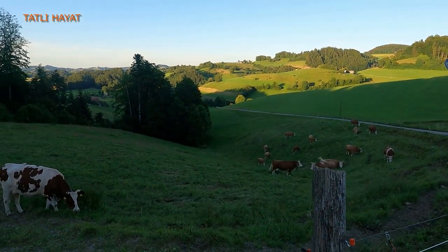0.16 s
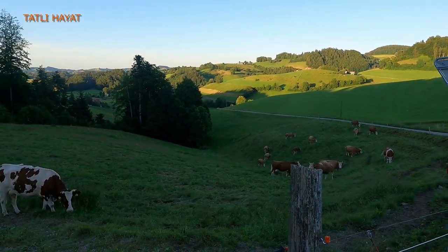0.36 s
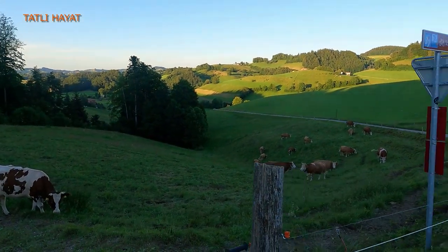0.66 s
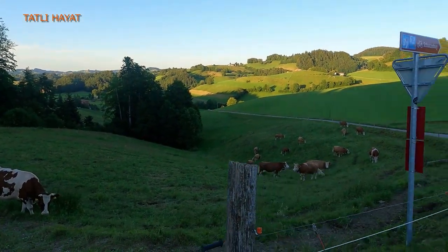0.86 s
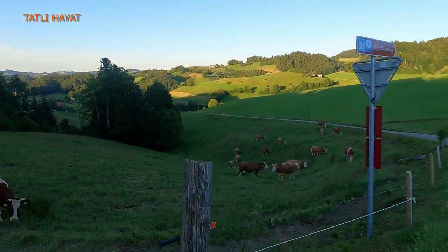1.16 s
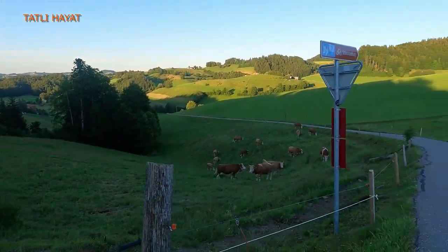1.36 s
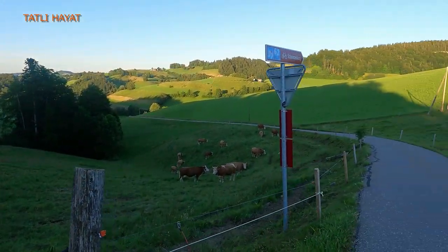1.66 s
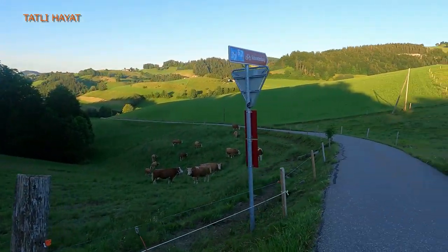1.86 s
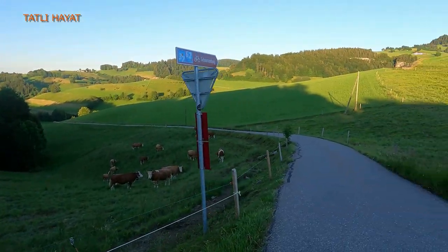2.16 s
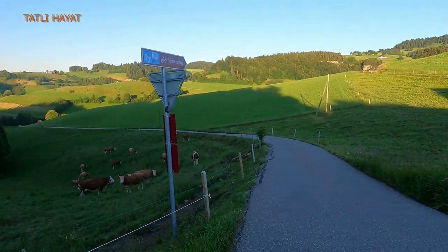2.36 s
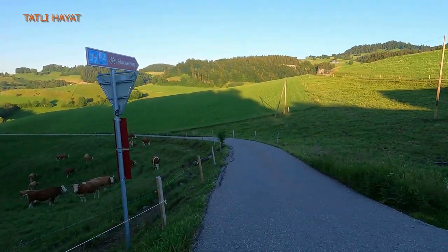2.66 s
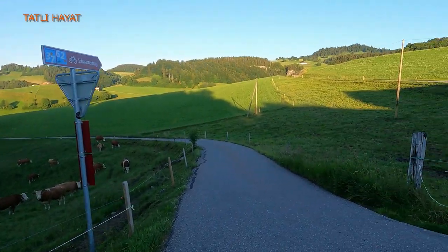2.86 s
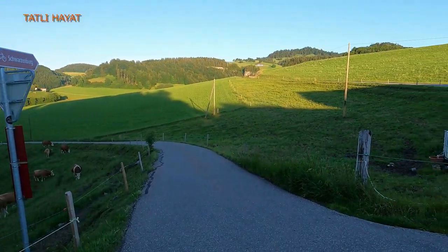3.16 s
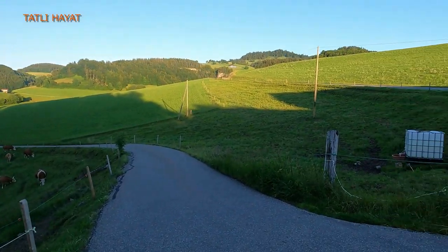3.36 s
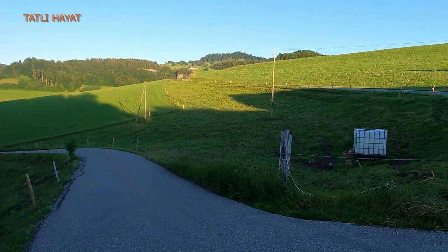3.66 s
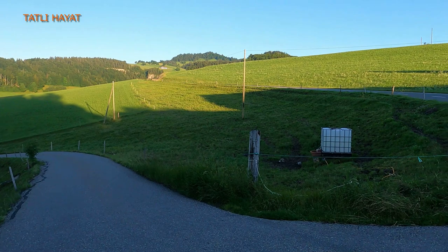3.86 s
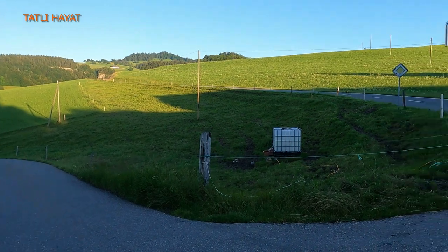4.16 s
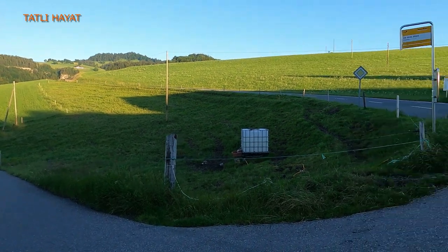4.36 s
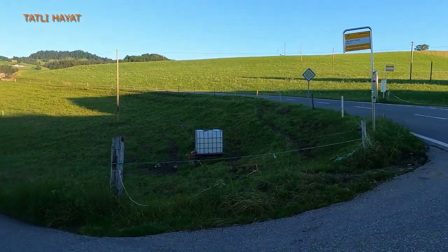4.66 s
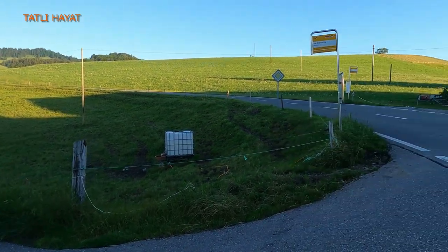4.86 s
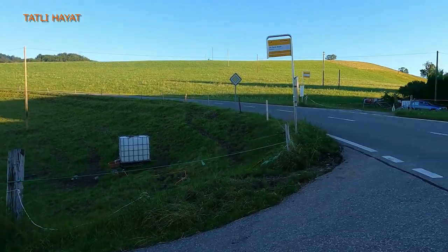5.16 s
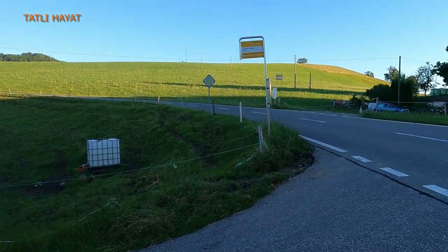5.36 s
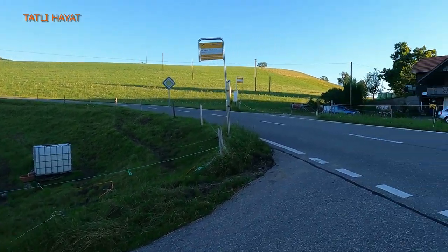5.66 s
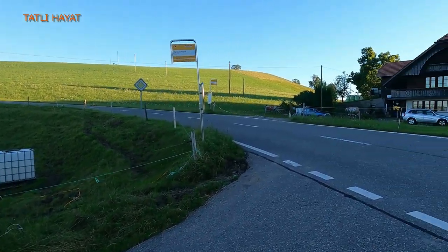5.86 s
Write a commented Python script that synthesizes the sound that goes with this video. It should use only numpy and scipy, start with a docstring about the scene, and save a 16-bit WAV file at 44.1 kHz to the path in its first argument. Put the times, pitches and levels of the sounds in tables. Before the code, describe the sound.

An open hillside pasture with a grazing herd, heard in stereo, about six seconds. From the start many bells overlap irregularly: a big sheet-metal bell with hollow clonks and rough metallic attack, a clearer cast bell that rings long, and lower, brighter and thinner bells farther off. Three tiny falling bird chips come at 0 to 0.1 and again near 2.4. Dull soft steps fall around 0.2, 0.6, 0.9, 1.1 and 2.3; a short damped metal clink sounds at 1.1. Soft low wind puffs peak near 1.7, with a grass rustle at 1.4. Strong clear ringing at 2.1, then a dense clanking run from 2.5 to 3. Between 1.2 and 4.2 the herd slides well left. Another clatter comes around 4 to 4.3, then sparser, quieter bells. A faint low motor hum swells, strongest near 5, then recedes. The slope returns a very faint dull echo.

```python
"""A hillside pasture where cows graze with bells: a big sheet-steel one, a long-ringing cast one, others further off.
Each bell is a sum of decaying modes in close pairs, plus a dense crowd of wall modes and a noisy tick at each strike.
The microphone turns away and the herd drifts left; the slope returns a faint, dull answer to the bells.
Shaped noise makes wind, grass, the valley's murmur and a few dull steps; steady tones make a distant motor.
A small bird chips in falling glides, and metal clinks as quickly damped modes."""
import sys
import numpy as np
from scipy import signal
from scipy.fft import rfft, irfft, next_fast_len
from scipy.io import wavfile
from scipy.ndimage import map_coordinates

SR = 44100
rng = np.random.default_rng(int(sys.argv[2]) if len(sys.argv) > 2 else 0)


def master_out(mix):
    """Clip the mix to full scale and print it as 16-bit PCM to the path in sys.argv[1]."""
    frames = np.transpose(np.atleast_2d(mix))
    ceiling = np.clip(frames, -1, 1)
    pcm = np.round(ceiling * 32767).astype(np.int16)
    wavfile.write(sys.argv[1], SR, pcm)


N = 265923

TOP_HZ = 15500  # upper band limit
KNEE_HZ = 2000  # hardness tilts a strike's spectrum above this
PRIME_HZ, LOW_HZ = 800, 1500  # band that holds the prime pair
UPPER_OCTAVES = 1.5  # octaves above the knee at which all upper modes are weighted

# Turn of the microphone, as the herd's left-minus-right level: (time [s], level difference [dB])
TURN = [(0, -0.5), (1.2, -1), (2.8, 6.5), (4.2, 13), (4.8, 12.5), (6.03, 12.5)]


def amp(db):
    """Level is logarithmic: 20 dB is a factor of ten in amplitude."""
    return 10 ** (np.asarray(db) / 20)


def unit(x):
    """Normalise the root mean square, the measure of mean power, to 1."""
    return x / np.sqrt(np.mean(x ** 2) + 1e-20)


def along(points, hz):
    """Interpolate (frequency, value) points on a logarithmic frequency axis, as pitch is heard."""
    f, v = np.transpose(points)
    return np.interp(np.log(hz + 1), np.log(f + 1), v)


def curve(rows):
    """Interpolate (time, value) rows linearly at every sample."""
    return np.interp(np.arange(N) / SR, *np.transpose(rows))


def wobble(rate):
    """Slow random fluctuation: a smooth spline through random knots, rate of them a second."""
    knots = rng.standard_normal(1024)
    return map_coordinates(knots, [np.arange(N) * rate / SR], mode="mirror")


def filtered(x, response):
    """Linear filtering: the spectrum is multiplied by a response of frequency."""
    m = next_fast_len(N + SR // 4)
    hz = np.fft.rfftfreq(m, 1 / SR)
    return irfft(rfft(x, m) * response(hz), m)[..., :N]


def noise(spectrum, side_db):
    """Mid-side stereo: independent noises of one colour, summed and differenced, then scaled to rms 1."""
    mid, side = filtered(rng.standard_normal((2, N)), lambda hz: amp(along(spectrum, hz)))
    side = amp(side_db) * side
    return unit(np.array([mid + side, mid - side]))


def add(track, s, sound):
    """Superposition: add a sound to a track at time s, cut at the track's ends."""
    start = round(s * SR)
    part = sound[..., max(-start, 0):max(N - start, 0)]
    first = max(start, 0)
    track[..., first:first + part.shape[-1]] += part


def upper_level(force_db, hardness=0, *place):
    """Contact duration: a harder, shorter blow drives upper modes more, wherever it lands."""
    return force_db + hardness * UPPER_OCTAVES


def mode_levels(hz, paired, force_db, hardness=0, lip_db=0, lean_db=0):
    """Modal excitation: hardness tilts the levels [dB]; the contact point weights prime pair and twins."""
    prime = (hz > PRIME_HZ) & (hz < LOW_HZ)
    twin = np.resize([-1, 1], len(hz))
    tilt_db = hardness * np.log2(np.maximum(hz / KNEE_HZ, 1))
    pair_db = force_db + tilt_db + lip_db * prime + lean_db * twin
    return np.where(paired, pair_db, upper_level(force_db, hardness))


def ring(modes, strikes, pairs_db, upper_db, uneven_db=2.5, port_db=0.0, port_phase=0.27, stop_time=0.013):
    """Modal superposition: each contact stops the old vibration and starts new decaying partials."""
    hz, mode_db, t60 = np.transpose(modes)
    # close pairs come first, since a bell is not round; then the single modes
    paired = np.arange(len(hz)) < 2 * len(pairs_db)
    balance_db = np.append(np.repeat(pairs_db, 2), np.full(np.sum(~paired), upper_db))
    mode_db = mode_db + balance_db
    gaps = np.abs(np.diff([row[0] for row in strikes] + [N / SR]))
    t = np.arange(int(gaps.max() * SR) + SR // 50) / SR
    waves = np.exp((2j * np.pi * hz - np.log(1000) / t60)[:, None] * t)
    # the low note swells in the bell's mouth, while high modes speak almost at once
    rise = .011 * (435 / hz) ** 1.2
    waves *= 1 - np.exp(-t / rise[:, None])
    # each mode's radiation pattern can set its level and phase at the two microphone ports
    level, phase = rng.standard_normal((2, len(hz)))
    port = np.array([[1], [-1]])
    port_angle = port * port_phase * phase * np.clip(hz / KNEE_HZ, 0, 2)
    ports = amp(port * port_db * level) * np.exp(1j * port_angle)
    out = np.zeros((2, N))
    for (s, *strike), gap in zip(strikes, gaps):
        db = mode_db + mode_levels(hz, paired, *strike) + uneven_db * rng.standard_normal(len(hz))
        blow = amp(db) * np.exp(2j * np.pi * rng.random(len(hz)))
        n = int(gap * SR) + SR // 50
        choke = np.cos(np.pi / 2 * np.clip((t[:n] - gap) / stop_time, 0, 1)) ** 2
        add(out, s, ((ports * blow) @ waves[:, :n]).real * choke)
    return out


def clank(strikes, clank_db, tick_db, hiss, life=0.25, tick_life=0.044, bounce_db=-9, count=140):
    """High modal density: impact rings a crowd of short wall modes and a noisy tick; the clapper bounces once."""
    # Colour of the wall modes: (frequency [Hz], relative level [dB])
    wall_colour = [(2500, -2), (5000, 2), (7500, -4), (10000, -19.5), (13000, -26), (15500, -39)]
    t = np.arange(SR // 3) / SR
    hz = rng.uniform(2500, TOP_HZ, count)
    size = amp(along(wall_colour, hz) + 6.62 * rng.standard_normal(count))
    # higher modes die sooner, with a random spread
    t60 = life * (6000 / hz) ** 0.34 * np.exp(0.53 * rng.standard_normal(count))
    tones = np.sin(2 * np.pi * (hz[:, None] * t + rng.random((count, 1))))
    waves = tones * amp(-60 * t / t60[:, None])
    out, ticks = np.zeros((2, N)), np.zeros(N)
    for s, *strike in strikes:
        upper_db = upper_level(*strike)
        bounce_delay = rng.uniform(0.011, 0.045)
        for delay, db in ((0, upper_db), (bounce_delay, upper_db + bounce_db)):
            # partly shared random weights leave the two channels partly alike
            shared, left, right = rng.standard_normal((3, count))
            weights = size * (shared + 0.76 * np.array([left, right]))
            add(out, s + delay, amp(db + clank_db) * weights @ waves)
            add(ticks, s + delay, amp(db + tick_db - 60 * t / tick_life))
    return out + ticks * hiss


def light_touches(db=-73, spread_db=4, count=18):
    """Random contact: loose clappers brush their bells once in each equal slot; rows (time [s], force [dB])."""
    times = (np.arange(count) + rng.random(count)) * N / SR / count
    return np.transpose([times, db + spread_db * rng.uniform(-1.1, 1, count)])


def herd():
    """Level-difference panning: bells of distinct modal balance drift left as the microphone turns."""
    # Bell modes, close pairs first: (frequency [Hz], relative level [dB], decay time t60 [s])
    big_modes = [(434, 9, .36), (441, -4, 1.4), (1137, -3.5, 2.3), (1159, -3.5, 4.6), (2079, 3, 2),
                 (2125, 4, 2), (3214, 0, .8), (3284, 2, .8), (4531, 0, .55), (4586, 0, .45), (4895, 3, .7),
                 (5210, 4, .4), (5570, -3, .3), (5927, 2, .4), (6055, 4, .27), (6185, 1, .5),
                 (6318, 1, .45), (6695, -3, .3), (6955, -6, .5), (7381, 0, .4), (7537, -5, .25),
                 (7677, -7, .35), (8150, -6, .34), (8866, -9, .4), (9695, -10, .38)]
    cast_modes = [(1208, 3, 5.3), (1256, 1, 6), (2228, -4.5, 2.8), (2285, 2.5, 2.3), (3471, -1, 1.1),
                  (3519, -5, .8), (1349, 19, .15), (4945, 10, .43), (6756, 3, .22)]
    deep_modes = [(364, -1, 1), (374, 4, 1.4), (964, -7, 2), (987, -11, 4), (1770, -5, 1.8), (1805, 0, 3.3),
                  (2734, -3.5, 1.3), (2795, -2, .7), (3819, 0, .7), (3935, 2.5, .6), (5200, 6, .25)]
    middle_modes = [(1047, -6.5, 4), (1058, -8, 2.5), (1941, -4, 2.2), (1953, -3, 2.6), (3003, 1, 1.1),
                    (3035, -7, 1), (4140, 7, .6), (4290, 12, .65)]
    bright_modes = [(1092, -4.5, 4), (1097, -7.5, 1.6), (1970, -1.5, 1.3), (1999, -2.5, 3.6),
                    (3108, 13, 1.2), (4241, 8, .7), (4391, 16, .66), (5539, 0, .34)]
    small_modes = [(458, -5, 1), (468, -6, 2.5), (2205, -2.5, 4), (2211, 1, 1.8), (3348, 19, 1.4),
                   (6950, 3, .25)]
    far_modes = [(880, -9.5, .9), (902, -9.5, 2.5), (1619, -5, 1.3), (1655, -3, 2.2), (2515, -3, 1.8),
                 (2573, -5, 2.2), (3661, 15, .7), (5940, -2, .5)]
    thin_modes = [(1833, 7, 1.8), (2851, 0, 1.8), (4013, 5, 1)]
    # Clapper strikes on the near bells: (time [s], force [dB], hardness [dB per octave above the knee],
    # prime-pair weight from contact height [dB], second-twin weight from place round the rim [dB])
    big_strikes = [(-0.05, -38, -24, -0.5, 2), (0.094, -41, -11.5, 2.5, -0.5), (0.3777, -28, -10.5, -15, 4),
                   (0.881, -40, -3.5, -2.5, -2), (1.0805, -44.5, 5, 3, 3), (1.3447, -42, 5, 5, -2),
                   (1.423, -42, -16, -5.5, -12.5), (1.5405, -45, -3.5, 0, 3), (1.7868, -36, -3, -13, 4.5),
                   (2.0111, -43, 1, 2, 5.5), (2.533, -35.5, -3.5, 8, 2), (2.5684, -31, -3, -10, -5),
                   (2.671, -34.5, -16, -13, 4), (2.7704, -39.5, -1, -16, 2.5), (2.805, -37, -3, 1, 1),
                   (2.9487, -36, 2.5, -5, -1.5), (3.011, -40, -1.5, 5.5, 2),
                   (3.2304, -45.5, -4.5, 5.5, 4.5), (3.4278, -54, 1, 10, -9), (3.468, -47, 2, 11, 4.5),
                   (3.83, -40.5, -13, 2, -0.5), (4.0032, -35, -6, 1.5, 3), (4.048, -32.5, -6.5, 0.5, 0),
                   (4.2616, -43, -2.5, 6, 3.5), (4.3121, -40.5, -1.5, 3, 0.5), (4.905, -51.5, -3, -3, -2.5),
                   (5.0273, -44.5, -7, -7, 1), (5.667, -51.5, -2, 4.5, 1.5), (5.9302, -52, -16, 2.5, 0)]
    cast_strikes = [(-0.05, -54.5, -5, 6.5, -6.5), (0.463, -42, 0.5, -4.5, 3), (0.855, -45.5, 4, 6.5, -4),
                    (1.14, -36, -5.5, -4.5, 1), (1.424, -41, -3, 4.5, -3), (2.0709, -30.5, -5, -13, -1.5),
                    (2.64, -38, -6, -14.5, 2)]
    # Clapper strikes on bells further off: (time [s], force [dB], hardness [dB per octave above the knee])
    deep_strikes = [(1.303, -53.5, 16), (1.826, -43, 3), (2.298, -46.5, 6), (2.789, -40.5, 6),
                    (3.3651, -47.5, 11), (3.926, -51.5, 4.5), (4.4948, -46, 6), (5.126, -47.5, 1.5)]
    middle_strikes = [(-0.05, -51, 6.5), (0.417, -45, -14), (0.6493, -39.5, -27), (0.846, -43, 1),
                      (1.193, -37, -20), (2.672, -45.5, 5.5), (3.1513, -54, 10.5), (3.431, -43, 8.5),
                      (3.707, -45.5, 3.5), (4.059, -47.5, 0), (5.1254, -44, -1), (5.862, -57, 7)]
    bright_strikes = [(0.378, -45.5, 8), (0.6494, -40.5, 2.5), (1.14, -42.5, 3), (1.6443, -46, 1.5),
                      (3.3662, -40.5, -1.5), (4.15, -43, -5), (5.436, -40.5, 1), (5.9324, -43, 6)]
    small_strikes = [(-0.05, -34, -24), (0.2562, -35.5, -4.5), (0.9724, -38, -4.5), (3.5747, -50, 5.5),
                     (4.16, -49, 6), (5.3833, -54, 8)]
    far_strikes = [(0.5322, -46.5, -1), (1.217, -47, -3), (1.378, -44, 3), (4.136, -61.5, 8),
                   (4.934, -52, -3.5), (5.241, -54, -10)]
    # Strikes on the thin bell, all of one hardness: (time [s], force [dB])
    thin_strikes = [(1.311, -54.5), (1.876, -64), (2.949, -63), (5.081, -66.5)]
    # Low booms of the big bell, at or just after many of its strikes, in its lowest pair:
    # (time [s], level [dB])
    low_booms = [(0.874, -31.5), (1.08, -34), (1.352, -29.5), (1.545, -23.5), (2.014, -32), (2.568, -23),
                 (2.815, -29.5), (2.951, -25), (3.2304, -29), (3.427, -29.5), (3.474, -29), (3.832, -66),
                 (4.048, -38), (4.311, -37.5), (5.667, -45)]
    # Colour of the clapper's tick: (frequency [Hz], relative level [dB])
    tick_colour = [(200, 5), (700, 0), (2000, 18), (5000, -31), (10000, 2), (16000, -23)]
    hiss = noise(tick_colour, side_db=-3)

    def bell(modes, strikes, pairs_db, upper_db, clank_db, tick_db):
        """Superposition of one bell's ring and attack."""
        return ring(modes, strikes, pairs_db, upper_db) + clank(strikes, clank_db, tick_db, hiss)

    bells = bell(big_modes, big_strikes, pairs_db=[-2, -2.5, 0.5, 4, 3], upper_db=-9.5, clank_db=-21, tick_db=-1.5)
    bells += ring(big_modes[:2], low_booms, pairs_db=[0], upper_db=0)
    bells += bell(cast_modes, cast_strikes, pairs_db=[0, 0, -1], upper_db=-12.5, clank_db=-28.5, tick_db=-2.5)
    bells += bell(deep_modes, deep_strikes, pairs_db=[-3, -4.5, 0, -1], upper_db=-21, clank_db=-39.5, tick_db=-15.5)
    bells += bell(middle_modes, middle_strikes, pairs_db=[-2, -1, 2], upper_db=-19.5, clank_db=-25.5, tick_db=-16)
    bells += bell(bright_modes, bright_strikes, pairs_db=[-4, 0], upper_db=-19, clank_db=-30, tick_db=-10)
    bells += bell(small_modes, small_strikes, pairs_db=[2, 0], upper_db=-16, clank_db=-29, tick_db=-4)
    bells += bell(far_modes, far_strikes, pairs_db=[-3, 1, 0], upper_db=-17, clank_db=-13.5, tick_db=-4)
    bells += bell(thin_modes, thin_strikes, pairs_db=[], upper_db=5, clank_db=-19.0, tick_db=-3)
    bells += clank(light_touches(), clank_db=-2, tick_db=-11, hiss=hiss)
    lean = amp(curve(TURN))
    return bells * np.array([2 * lean, 2 * np.ones(N)]) / (1 + lean)


def hillside(x, t60=1.0):
    """Diffuse scattering: slope and trees answer as convolution with a decaying noise tail, dulled on top."""
    t = np.arange(SR // 2) / SR
    tail = rng.standard_normal((2, len(t))) * amp(-60 * t / t60) * (1 - np.exp(-t / 0.04))
    wet = signal.fftconvolve(x, tail / np.linalg.norm(tail[0]), axes=1)[:, :N]
    return filtered(wet, lambda hz: 1 / (1 + (hz / 8000) ** 2))


def swelling(steady_db, shelter, swells):
    """Amplitude envelope: a gain falling by shelter dB per dB of turn, plus Gaussian swells."""
    t = np.arange(N) / SR
    steady = amp(steady_db - shelter * curve(TURN))
    return steady + sum(amp(db) * np.exp(-((t - s) / half) ** 2) for s, db, half in swells)


def pasture():
    """Shaped noise and pure tones: wind on the microphone, rustling grass, valley murmur, distant motor."""
    # Noise colours of wind, grass and valley: (frequency [Hz], relative level [dB])
    buffet_colour = [(15, 5.5), (35, 3), (60, 7), (100, -2.5), (200, -23), (500, -44), (2000, -65)]
    blade_colour = [(300, -8.5), (900, 6.5), (3500, 4.5), (6000, 1), (9000, -10), (12000, -18.5),
                    (13500, -27.5), (16000, -23)]
    valley_colour = [(20, -23), (55, 4), (85, 9), (120, -9.5), (170, 1.5), (260, -9), (450, -1),
                     (750, -31.5), (1500, -12.5), (3000, -11), (8000, -57), (16000, -81)]
    # Gusts, then swells of rustling grass: (peak time [s], added level [dB], half length to 1/e [s])
    gusts = [(0.55, -44.5, 0.16), (1.747, -35.5, 0.21), (3.86, -51.5, 0.15), (5.887, -52.5, 0.1)]
    rustles = [(1.38, -52.5, 0.36)]
    # Motor tones: (frequency [Hz], rms level before the swell [dB])
    hum_lines = [(161.5, -62.5), (247.6, -62.5)]
    # Swell of the motor: (time [s], gain [dB])
    hum_swell = [(0, -16.5), (3.3, -6.5), (5, 0.5), (6.03, -11)]
    wind_gain = swelling(-52, 1, gusts) * amp(3.0 * wobble(6.7))
    wind = wind_gain * noise(buffet_colour, side_db=-15.5)
    grass_gain = swelling(-58, 0.58, rustles) * amp(1.8 * wobble(70))
    grass = grass_gain * noise(blade_colour, side_db=-7.5)
    valley = amp(-54.5 + 1.5 * wobble(10.0)) * noise(valley_colour, side_db=-8.5)
    t = np.arange(N) / SR
    motor = np.zeros(N)
    for hz, db in hum_lines:
        phase = 2 * np.pi * hz * t + 0.28 * wobble(6)
        motor += amp(db) * np.sqrt(2) * np.sin(phase)
    return wind + grass + valley + amp(curve(hum_swell)) * motor


def bird(start_hz=4600, end_hz=4120, length=0.012):
    """Frequency glide: far-off chips are short sines that fall in pitch under a half-sine envelope."""
    # Chips: (time [s], level [dB])
    chip_times = [(0.01, -56), (0.059, -47), (.105, -48), (2.395, -57), (2.435, -51), (2.483, -48)]
    u = np.linspace(0, 1, int(length * SR))
    hz = start_hz + (end_hz - start_hz) * u
    chip = np.sin(np.pi * u) * np.sin(2 * np.pi * np.cumsum(hz) / SR)
    out = np.zeros(N)
    for s, db in chip_times:
        add(out, s, amp(db) * chip)
    return out


def steps(rise=0.013, fall=0.014):
    """Damped impact: steps on turf are low noise under a soft rise and a short decay (time constants [s])."""
    # Steps: (time [s], peak level of the envelope [dB])
    step_times = [(0.214, -38), (0.551, -45.5), (0.902, -32.5), (1.148, -38.5), (2.26, -45.5)]
    # Colour of the turf: (frequency [Hz], relative level [dB])
    turf_colour = [(30, -19), (100, -1.5), (160, -3.5), (300, -13), (450, -10), (1500, -40.5), (6000, -48)]
    t, push = np.arange(SR // 5) / SR, np.zeros(N)
    shape = (1 - np.exp(-t / rise)) ** 2 * np.exp(-t / fall)
    for s, db in step_times:
        add(push, s, amp(db) * shape / shape.max())
    return push * noise(turf_colour, side_db=-26)


def clinks():
    """Contact damping: metal knocks against the cast bell and stays on it, so the modes die fast."""
    # Short hard contacts: (time [s], level [dB])
    contacts = [(1.142, -29.5), (1.219, -50)]
    # Damped modes: (frequency [Hz], relative level [dB], decay time t60 [s])
    damped_modes = [(2346, 1.5, 0.33), (3540, 2.5, 0.31), (3840, -16, 0.042), (3980, -9, 0.019)]
    t, out = np.arange(SR // 3) / SR, np.zeros(N)
    for s, db in contacts:
        for hz, level, t60 in damped_modes:
            add(out, s, amp(db + level - 60 * t / t60) * np.sin(2 * np.pi * hz * t))
    return out


def scene():
    """Superposition of the herd, the hillside's answer to it and the sounds around."""
    bells = herd()
    return bells + amp(-27.0) * hillside(bells) + pasture() + bird() + steps() + clinks()


def record(dry):
    """Band limitation: the recorder keeps nothing above its upper limit."""
    return filtered(dry, lambda hz: hz < TOP_HZ)


dry = scene()
out = record(dry)
master_out(out)
```